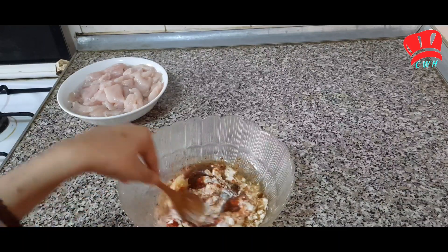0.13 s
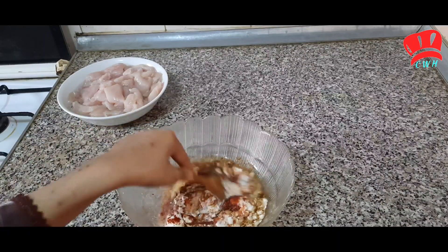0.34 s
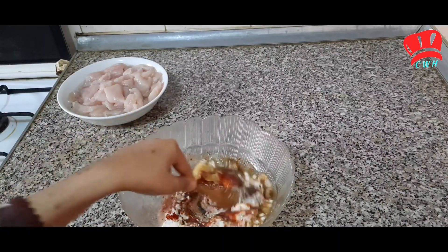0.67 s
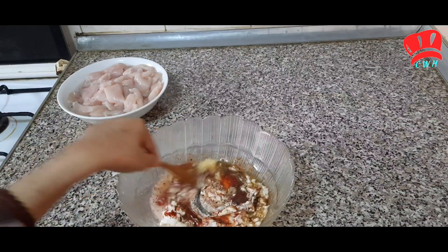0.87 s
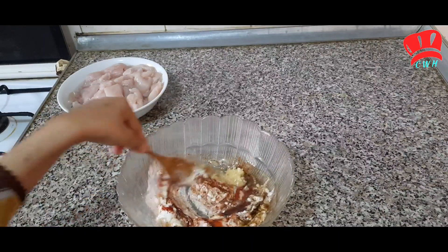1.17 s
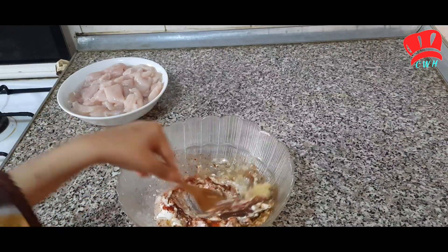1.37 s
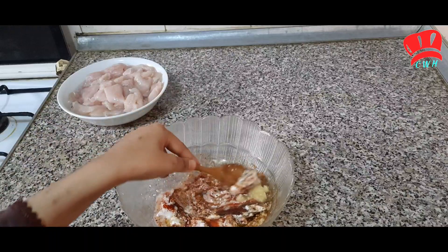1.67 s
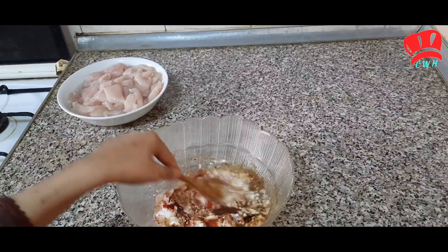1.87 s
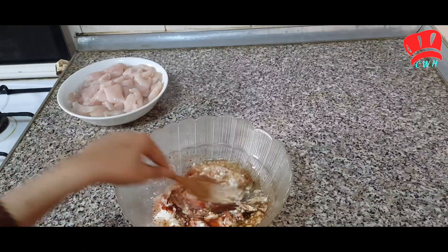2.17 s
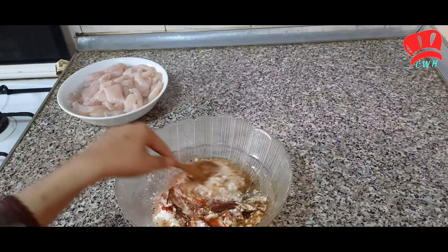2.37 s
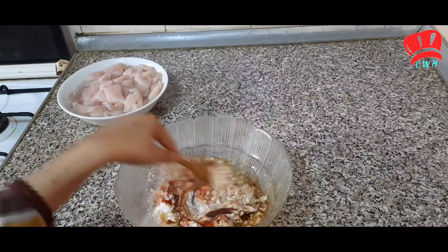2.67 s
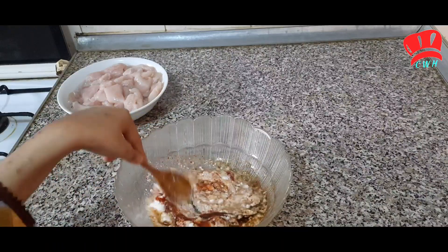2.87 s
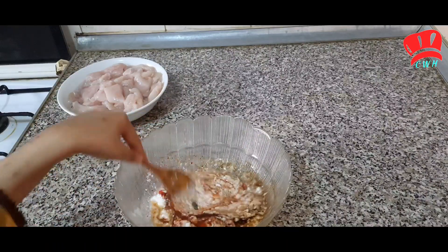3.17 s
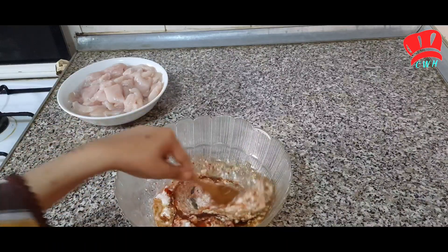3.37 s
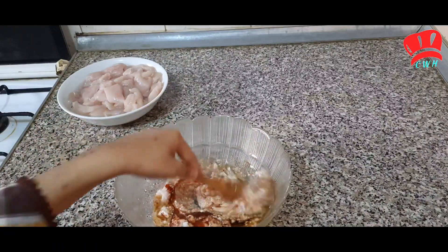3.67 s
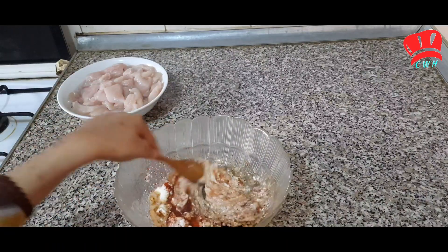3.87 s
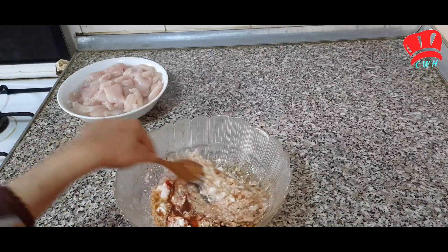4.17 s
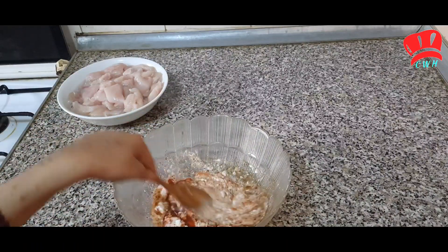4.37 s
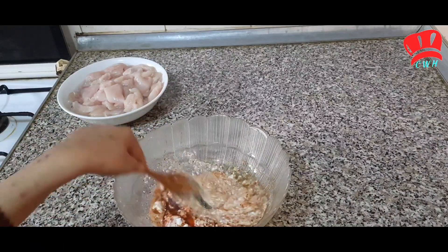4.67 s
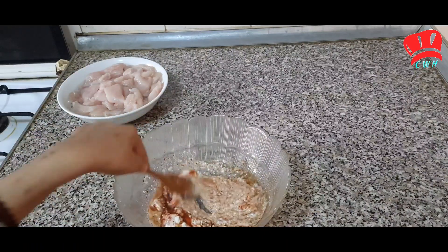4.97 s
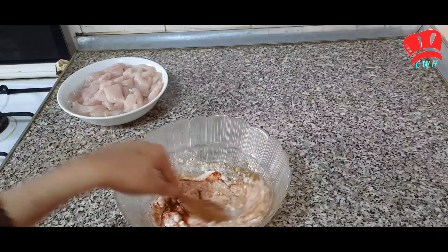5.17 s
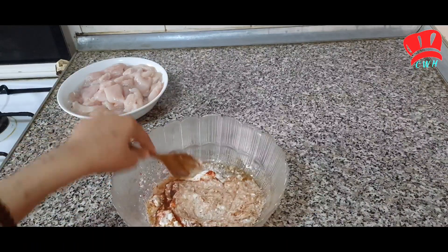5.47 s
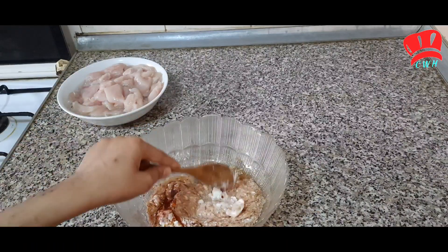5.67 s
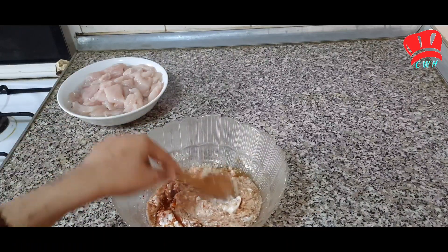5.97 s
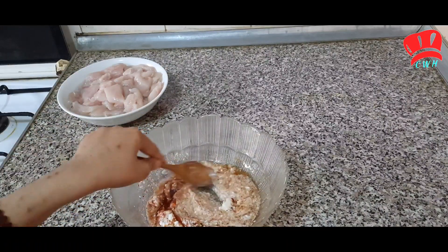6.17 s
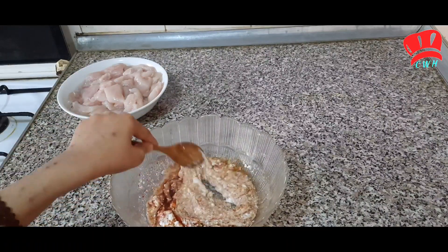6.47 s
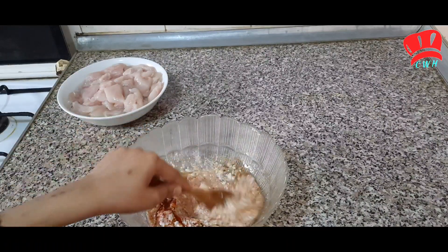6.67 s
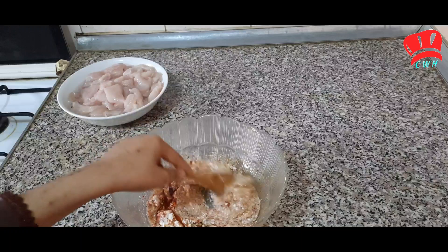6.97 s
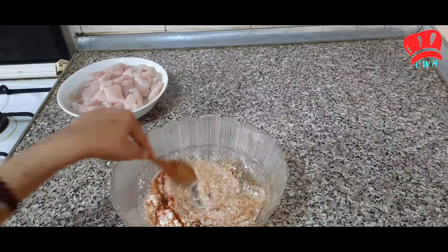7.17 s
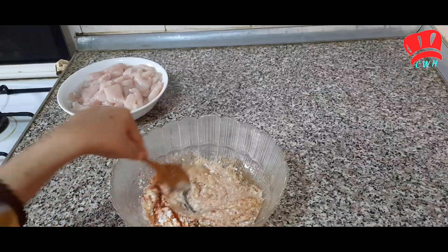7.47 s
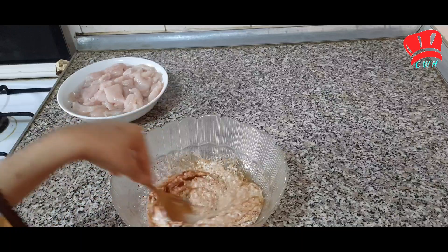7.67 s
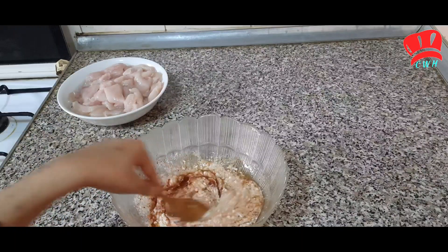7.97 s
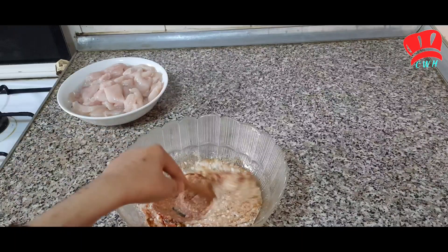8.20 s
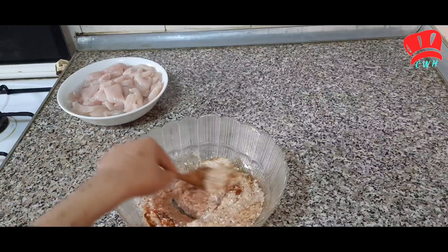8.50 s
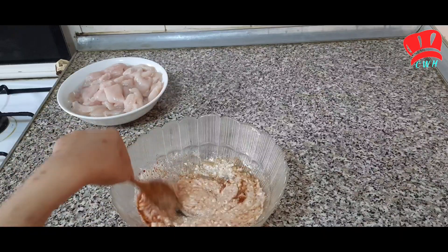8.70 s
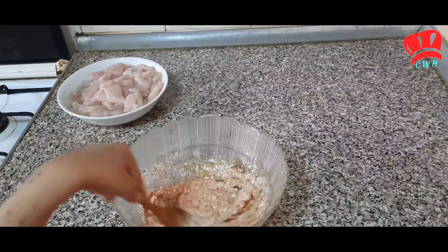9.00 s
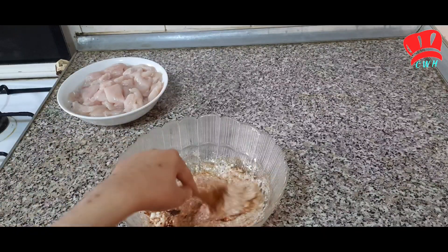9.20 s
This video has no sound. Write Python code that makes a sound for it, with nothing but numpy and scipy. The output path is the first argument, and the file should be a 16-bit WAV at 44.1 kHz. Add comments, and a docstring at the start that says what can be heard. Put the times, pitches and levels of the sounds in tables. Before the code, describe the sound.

A wooden spoon stirs thick wet marinade in a glass bowl on a stone counter, close to the microphone. From the start, soft squelches, sticky smacks and tiny bubble crackles come in uneven sweeps, with low rubbing and light bumps. At about 2.1 seconds the spoon knocks the bowl with a wet smack and a small glass clack. From 2.5 to 5 seconds the stirring is busier, roughly two strokes a second, with dull drags against the bowl. The loudest knock comes at about 5.5 seconds. A few light clacks on bare glass follow between 6.4 and 7 seconds. The wet stirring goes on, with a cluster of smacks and bumps around 8.3 seconds and another knock and clack near 8.9. The sounds are fairly quiet and ring briefly in the tiled kitchen, over a faint steady appliance hum.

```python
"""A tiled kitchen, the stereo microphone close to a glass bowl on a stone counter. A wooden spoon stirs thick
marinade, sweep by sweep: air pockets smack open and tiny wet films crackle along the stroke. The spoon rubs and
knocks the paste-damped bowl against the counter. Behind it the room rings briefly over a faint appliance hum."""
import sys
import numpy as np
from scipy import signal
from scipy.fft import rfft, irfft
from scipy.io import wavfile
from scipy.ndimage import uniform_filter1d, map_coordinates

SR = 44100
rng = np.random.default_rng(int(sys.argv[2]) if len(sys.argv) > 2 else 0)


def log_audio(samples):
    """Write samples as a 16-bit WAV file to the path given in sys.argv[1]."""
    # one column per channel
    frames = np.atleast_2d(samples).T
    # limit to full scale, then quantise
    limited = np.clip(frames, -1, 1)
    pcm = np.round(limited * 32767).astype(np.int16)
    wavfile.write(sys.argv[1], SR, pcm)


N = 411894
TIME = np.arange(N) / SR

# Levels are relative within a table; the functions set each layer's gain.
# room tone spectrum: frequency_hz, gain_db
ROOM_TONE = [(30, -42), (50, 13.5), (75, -13), (100, -7), (130, -3), (200, -11), (320, 1.5), (620, -9),
             (1200, -11), (1700, -17), (3500, -33), (8500, -27.5), (11000, -24), (12700, -23), (15000, -27)]
# appliance hum lines: pitch_hz, level_db
HUM_LINES = [(97, -69), (641, -77), (13873, -89.5)]
# decay of the kitchen: frequency_hz, t60_s
ROOM_DECAY = [(100, 0.24), (260, 0.23), (700, 0.36), (1840, 0.33), (4850, 0.25), (14000, 0.044)]
# likeness of diffuse sound at the two microphone ports: frequency_hz, coherence
PORT_COHERENCE = [(60, 0.98), (200, 0.93), (400, 0.2), (700, 0), (16000, 0)]
# balance of the ports: frequency_hz, left_over_right_db
PORT_BALANCE = [(150, 0.7), (330, -1.5), (700, 4.5), (1400, 2), (2800, 3.5), (5600, -1), (10000, 3.5),
                (14000, 6)]
# spectrum of the spoon rubbing the bowl: frequency_hz, gain_db
RUB_SPECTRUM = [(30, -27.5), (75, -9), (115, 2), (180, -15.5), (330, -3.5), (480, -17.5), (750, -11.5),
                (1200, -54), (3000, -32)]
# modes of the damped bowl and counter: pitch_hz, level_db, t60_s
BOWL_MODES = [(63, -14, 0.26), (111.6, 7.5, 0.14), (154.4, 6, 0.13), (232.2, -2.5, 0.22), (304, -4.5, 0.26),
              (384.4, -10, 0.29), (536, -28.5, 0.28), (635, -18.5, 0.087), (712, -30, 0.4),
              (830, -23.5, 0.12), (966, -31, 0.35)]
# hard drags of the spoon: start_s, length_s, level_db
SPOON_DRAGS = [(0.61, 0.17, -44.5), (2.614, 0.19, -56), (3.184, 0.33, -53), (3.656, 0.16, -52),
               (3.84, 0.22, -58), (4.293, 0.11, -51.5), (4.547, 0.14, -52.5), (4.834, 0.16, -56.5),
               (5.108, 0.13, -50.5)]
# the spoon bumps the bowl: start_s, level_db, hardness_db (middle over bass)
SPOON_KNOCKS = [(0.341, -57, 6), (0.666, -47.5, -5.5), (0.712, -49.5, -41), (0.976, -49.5, -4),
                (1.609, -55.5, 3), (2.137, -35, 2), (2.443, -47, 1.5), (2.747, -42, -5), (2.763, -38.5, -4),
                (3.317, -53, -2.5), (3.709, -44.5, -8.5), (4.181, -55, -15), (4.324, -51.5, -40),
                (4.878, -59, 0), (5.159, -43.5, -13.5), (5.552, -28, -0.5), (5.571, -33, -1),
                (5.836, -60.5, 14.5), (6.366, -51.5, 1.5), (7.271, -53, 1.5), (8.244, -52, 3),
                (8.276, -51, 1), (8.32, -48, 3), (8.445, -50.5, -7), (8.921, -43.5, 4)]
# modes of the bare glass wall: pitch_hz, level_db
GLASS_MODES = [(1460, -2), (1599, 0), (1776, -1), (1985, -1), (2430, -9), (3526, -5), (3741, -4)]
# the spoon hits glass above the paste: start_s, level_db, brightness_db_per_octave
GLASS_CLACKS = [(2.143, -47, -3), (5.553, -46, -6), (6.364, -44, -8), (6.429, -46, -10), (6.827, -43.5, 1),
                (6.841, -47, -6), (6.941, -55, -10), (8.925, -45, 2)]
# sweeps through the paste: start_s, length_s, squelch_db, crackle_db, swell_db, hollow_hz
SWEEPS = [(0, 0.022, -65.5, -76, -5, 1550), (0.09, 0.74, -69.5, -65.5, -8, 2145),
          (0.69, 0.47, -76, -65.5, 2, 1604), (1.09, 0.26, -73, -76, -9, 1540),
          (1.32, 0.26, -64.5, -66, -12.5, 1610), (2.45, 0.53, -64, -60.5, -1, 1710),
          (3.04, 0.45, -62.5, -63.5, -7, 1720), (3.59, 0.39, -81, -68, -27.5, 2150),
          (4.0, 0.46, -64.5, -68, -9, 2040), (4.41, 0.41, -70.5, -70.5, 1, 1890),
          (4.8, 0.35, -73, -70, -14, 1940), (5.82, 0.083, -74.5, -74.5, 15.5, 1550),
          (6.68, 0.033, -65.5, -91, 14.5, 1720), (6.87, 0.19, -63.5, -62.5, 3.5, 1684),
          (7.27, 1, -69.5, -70.5, 5, 2360), (7.94, 0.016, -65.5, -56, -4, 2510),
          (8.09, 0.053, -73, -62, -12, 2400), (8.24, 0.41, -66.5, -67, -7.5, 2130),
          (8.67, 0.31, -61.5, -69, 9, 2250), (9.2, 0.17, -65, -66, 13, 1500)]
# spectrum of a bursting film: frequency_hz, gain_db
FILM_SPECTRUM = [(300, 19), (700, -23), (1300, 7), (3500, 13), (6000, 8), (9000, -7), (13000, 12),
                 (16000, -6)]
# air squeezed through a gap in the paste: start_s, length_s, from_hz, to_hz, level_db, ring_cycles
AIR_SQUEAKS = [(1.102, 0.051, 1300, 1440, -59, 2), (2.782, 0.11, 2560, 1740, -60, 2.5),
               (2.866, 0.088, 1870, 1570, -55.5, 3.5), (3.017, 0.12, 2830, 1430, -55.5, 7),
               (4.111, 0.11, 2240, 1270, -57.5, 2.7), (4.576, 0.044, 2600, 2400, -59, 12),
               (4.673, 0.091, 880, 830, -59, 5.9), (6.374, 0.073, 2040, 1620, -48, 2.2),
               (7.323, 0.08, 2350, 2550, -56, 9.5), (8.266, 0.038, 1644, 1785, -45.5, 16),
               (8.799, 0.083, 2410, 2850, -61.5, 6.5)]
# bubbles bursting at the spoon's edge: peak_s, level_db, pitch_hz
BUBBLE_PIPS = [(0.467, -49, 3100), (0.572, -52.5, 4130), (0.693, -49.5, 5500), (1.041, -49, 10700),
               (1.184, -46.5, 3470), (2.13, -44, 8850), (2.537, -45, 6150), (2.623, -53, 10700),
               (2.698, -42, 8950), (2.722, -52.5, 3450), (2.932, -54, 11000), (3.221, -48, 3970),
               (3.271, -43, 4000), (3.603, -42, 5270), (3.605, -55, 10500), (3.755, -47.5, 4500),
               (4.016, -54, 8700), (4.028, -51, 2180), (4.233, -47, 4820), (4.241, -42.5, 3700),
               (4.347, -52.5, 2330), (4.497, -45, 3850), (4.68, -43.5, 3260), (4.765, -51.5, 9100),
               (4.83, -45.5, 3180), (5.164, -59, 4600), (5.366, -60, 14000), (5.626, -47.5, 10800),
               (6.408, -41.5, 6040), (6.723, -51.5, 10150), (6.827, -40, 3540), (7.199, -55, 13300),
               (7.613, -58, 2680), (7.925, -53, 3260), (8.095, -49, 6100), (8.322, -47.5, 2620),
               (8.369, -49, 3350), (8.69, -42, 4800), (8.924, -34.5, 3400)]
# the loudest wet smacks under the spoon: start_s, level_db, pocket_hz, snap_db, plop_db
WET_SMACKS = [(0.086, -47, 1890, -3.5, -1.5), (0.108, -44, 2400, -25, -3), (0.345, -47.5, 3360, -12, 3.5),
              (0.442, -48, 2310, -5.5, -5.5), (0.691, -48, 1590, -1, -6), (0.776, -44, 1370, -14, -5),
              (1.102, -41, 1290, -12.5, -37), (1.174, -44.5, 2260, -10, -23), (1.285, -50.5, 1680, -27, 0),
              (1.329, -43, 1570, -25, -5), (1.42, -43, 1630, -23, -7), (1.469, -40, 1470, -25, -23),
              (1.639, -49, 1390, -6.5, 0), (2.127, -47, 2470, 0.5, -4), (2.141, -33, 1540, -8.5, -3),
              (2.426, -39.5, 2200, -12, -4.5), (2.536, -47.5, 1950, -9, -1),
              (3.077, -46.5, 1530, -20, -3.5), (3.219, -41, 1920, -5, -13), (3.382, -49, 1810, -8, -17),
              (3.464, -44, 1060, -12, -8), (3.585, -44, 1700, -8, -5), (3.708, -45.5, 1410, -9, 4.5),
              (3.997, -51, 1330, -0.5, 5), (4.107, -47.5, 2230, -34, -32), (4.177, -41.5, 2160, -7, -4.5),
              (4.233, -49.5, 2180, 0.5, 5.5), (4.428, -43, 2020, -10, -40),
              (4.495, -42.5, 1700, -10.5, -21), (4.573, -43, 2640, -10, -10.5), (4.677, -41, 1630, -14, -2),
              (4.727, -46.5, 1620, -8.5, -9), (4.765, -43.5, 1520, -9, 0), (4.951, -44, 1670, -13.5, -14),
              (5.166, -46, 2240, -2.5, -32), (5.543, -44, 1380, -12, 12), (5.552, -38.5, 2170, -14.5, 7),
              (6.053, -53, 13500, 6.5, -28), (6.118, -42, 2070, -4, -11), (6.175, -41.5, 1510, -12, -30),
              (6.364, -34.5, 1950, -8.5, -14), (6.409, -48.5, 1750, -0.5, -11),
              (6.597, -51, 1460, -34, 3.5), (6.828, -36, 1570, -40, -23), (7.198, -49, 3850, -3, -34),
              (7.276, -46, 1480, -6.5, 5.5), (7.453, -54, 2400, -7, -18), (8.249, -44.5, 2400, -8.5, 7.5),
              (8.273, -43, 1750, -11, 3.5), (8.335, -43.5, 2430, -9, -32), (8.431, -42, 1800, -7.5, -37),
              (8.664, -44, 1740, -14, -1), (8.689, -38.5, 1570, -20, -20), (8.925, -36, 2240, -13.5, 1),
              (9.149, -49.5, 1420, -14, -36), (9.276, -45.5, 1410, -29, -4.5)]

SQUELCH, CRACKLE = 2, 3  # the level columns of SWEEPS


def amp(db):
    return 10 ** (np.asarray(db) / 20)


def unit_rms(x):
    return x / np.sqrt(np.mean(x ** 2) + 1e-20)


def unit_crest(x, size=220):
    """Scaled so that the loudest stretch of `size` samples has rms 1."""
    return x / np.sqrt(uniform_filter1d(x ** 2, size, mode="constant").max() + 1e-20)


def curve_at(points, hz):
    """A table interpolated along log frequency."""
    freqs, values = np.transpose(points)
    return np.interp(np.log(hz + 1), np.log(freqs), values)


def add(mix, start_s, sound):
    part = mix[max(round(start_s * SR), 0):][:len(sound)]
    part += sound[:len(part)]


def colour(x, spectrum, size=4096):
    """Causal filter with the given spectrum, so that clicks keep their sharp front."""
    log_gain = np.log(amp(curve_at(spectrum, abs(np.fft.fftfreq(size, 1 / SR)))))
    taps = np.fft.ifft(np.exp(np.conj(signal.hilbert(log_gain)))).real[:size // 2]
    return signal.oaconvolve(x, taps)[:len(x)]


def band(x, low_hz, high_hz):
    sos = signal.butter(2, [low_hz, min(high_hz, .48 * SR)], "band", fs=SR, output="sos")
    return signal.sosfilt(sos, x)


def clicks(per_s, spread_db, size=N):
    """Random impulses of either sign: many small, a few large."""
    height = amp(spread_db * np.minimum(rng.exponential(1, size), 2.6))
    return height * rng.choice([-1, 1], size) * (rng.random(size) < per_s / SR)


def excite(impulses, ring):
    return signal.oaconvolve(impulses, ring)[:N]


def diffuse(pair):
    """Two unrelated signals become alike in the bass, as at two closely spaced ports."""
    left, other = rfft(pair)
    alike = curve_at(PORT_COHERENCE, np.fft.rfftfreq(pair.shape[1], 1 / SR))
    right = alike * left + np.sqrt(1 - alike ** 2) * other
    return irfft(np.array([left, right]), pair.shape[1])


def room(x, wet_db, tails=4, slot=14):
    """Direct sound plus dense reflections off counter and tiles, which shift as the spoon circles."""
    out, slots = np.array([x, x]), np.arange(90, SR // 2, slot)
    for k in range(tails):
        taps = np.zeros((2, SR // 2 + slot))
        arrivals = slots + rng.integers(0, slot, (2, len(slots)))
        np.put_along_axis(taps, arrivals, rng.choice([-1., 1.], arrivals.shape), 1)
        hz, t, spectra = signal.stft(diffuse(taps), SR, nperseg=256)
        decay = amp(-60 * t / curve_at(ROOM_DECAY, hz)[:, None])
        tail = signal.istft(spectra * decay, SR, nperseg=256)[1]
        tail /= np.linalg.norm(tail[0])
        share = np.sqrt(2 / tails) * np.cos(np.pi * (TIME + k / tails))
        out += amp(wet_db) * signal.oaconvolve((x * share)[None], tail, axes=1)[:, :N]
    return out


def bowl_echo(x, delay_s=.0046, echo_db=-15.5):
    """The far wall of the bowl throws each wet sound back."""
    return x + amp(echo_db) * np.pad(x, (round(delay_s * SR), 0))[:N]


def room_tone(air_db=-67, drift_db=1, waver_rad=.3):
    """Gently drifting room air and the slightly wavering hum of an appliance."""
    noise = diffuse(rng.standard_normal((2, N)))
    spectrum = amp(curve_at(ROOM_TONE, np.fft.rfftfreq(N, 1 / SR)))
    air = unit_rms(irfft(rfft(noise) * spectrum, N))
    hum, knots_s = np.zeros(N), np.linspace(0, TIME[-1], 90)
    for hz, db in HUM_LINES:
        waver = np.interp(TIME, knots_s, np.cumsum(rng.normal(0, waver_rad, len(knots_s))))
        hum += amp(db) * np.sqrt(2) * np.sin(2 * np.pi * hz * TIME + waver)
    drift = np.interp(TIME, knots_s, rng.standard_normal(len(knots_s)))
    return amp(air_db + drift_db * drift) * air + hum


def effort(column, bite_s=.002, settle_s=.042, creep_db=-94):
    """Amplitude of the stirring: each sweep bites, swells or fades, and lets go; then the paste creeps."""
    level = np.full(N, amp(creep_db))
    for sweep in SWEEPS:
        start_s, length_s, _, _, swell_db, _ = sweep
        age = TIME - start_s
        gate = np.clip(age / bite_s, 0, 1) * np.exp(-np.maximum(age - length_s, 0) / settle_s)
        level += gate * amp(sweep[column] + swell_db * (np.clip(age / length_s, 0, 1) - .5))
    return level


def rubbing(rest_db=-71.5, push_db=-2):
    """The spoon sticks and slips over lumps on the glass, pressing harder in a strong sweep."""
    pressure = np.hypot(amp(rest_db), amp(push_db) * effort(SQUELCH))
    slips = colour(clicks(per_s=420, spread_db=3), RUB_SPECTRUM)
    return room(unit_rms(slips) * pressure, wet_db=.5)


def drags(tilt_db_per_octave=-5, centre_hz=85):
    """Quick slips of the spoon keep the bowl's lowest modes shuddering on the counter."""
    out, t = np.zeros(N), np.arange(SR // 4) / SR
    ring = sum(amp(db + tilt_db_per_octave * abs(np.log2(hz / centre_hz)) - 60 * t / t60)
               * np.sin(2 * np.pi * hz * t) for hz, db, t60 in BOWL_MODES)
    shudder = excite(clicks(per_s=300, spread_db=1.6), ring)
    for start_s, length_s, db in SPOON_DRAGS:
        part = shudder[round(start_s * SR):][:int(length_s * SR)]
        add(out, start_s, amp(db) * unit_rms(part) * signal.windows.tukey(len(part), .7))
    return room(out, wet_db=-12)


def knocks(contact_s=.0065, chatter_s=.014, ring_db=1, chatter_db=-7):
    """Each bump rings the bowl; harder ones reach the upper modes, and the foot chatters on the stone."""
    rings, chatters, t = np.zeros(N), np.zeros(N), np.arange(SR // 3) / SR
    for start_s, db, hardness_db in SPOON_KNOCKS:
        tilt_db = .83 * (min(hardness_db, 0) + 5)  # per octave away from 130 Hz
        modes = sum(amp(mode_db + tilt_db * abs(np.log2(hz / 130)) - 60 * t / t60)
                    * np.sin(2 * np.pi * hz * rng.normal(1, .009) * t)
                    for hz, mode_db, t60 in BOWL_MODES)
        ring = modes * (1 - np.exp(-t / contact_s))  # the paste cushions the blow
        chatter = band(rng.standard_normal(len(t)) * np.exp(-t / chatter_s), 200, 520)
        add(rings, start_s, amp(db + ring_db) * unit_crest(ring, size=660))
        add(chatters, start_s, amp(db + chatter_db + hardness_db) * unit_crest(chatter))
    return room(rings, wet_db=-10.5) + room(chatters, wet_db=2.5)


def clacks(t60_s=.21, spot_spread_db=2):
    """Wood on bare glass: every clack lands on another spot and rings another mix of modes."""
    out, t = np.zeros(N), np.arange(SR // 4) / SR
    for start_s, db, brightness in GLASS_CLACKS:
        ring = sum(amp(mode_db + brightness * np.log2(hz / 1800) + rng.normal(0, spot_spread_db))
                   * np.sin(2 * np.pi * (hz * t + rng.random())) for hz, mode_db in GLASS_MODES)
        add(out, start_s, amp(db - 60 * t / t60_s) * unit_crest(ring))
    return room(out, wet_db=-4)


def fizz(gain_db=-9):
    """Countless microscopic films tear as the paste slides off the wood."""
    tears = band(clicks(per_s=1500, spread_db=3), 5000, 11500)
    return unit_rms(tears) * effort(CRACKLE) * amp(gain_db)


def squeaks(gain_db=-2):
    """Tiny uneven bursts ring one air pocket as it swells or shrinks; a damped pocket wobbles more."""
    out = np.zeros(N)
    for start_s, length_s, from_hz, to_hz, db, cycles in AIR_SQUEAKS:
        size = int(length_s * SR)
        wobble = unit_rms(uniform_filter1d(rng.standard_normal(SR // 4), size=200))[:size]
        hz = np.geomspace(from_hz, to_hz, size) * np.exp(.25 * wobble / cycles)
        phasor = np.exp(2j * np.pi * np.cumsum(hz) / SR)
        feedback = np.exp(-from_hz / cycles / SR)
        bursts = clicks(per_s=320, spread_db=2.2, size=SR // 4)[:size]
        ring = (phasor * signal.lfilter([1], [1, -feedback], bursts / phasor)).imag  # gliding resonator
        add(out, start_s, amp(db + gain_db) * unit_rms(ring) * signal.windows.tukey(size, .5))
    return out


def pocket(t, hz, cycles, rise=.022):
    """An air pocket rings for a few cycles, its pitch rising as it opens."""
    age = t * hz / cycles
    return np.exp(-age) * np.sin(2 * np.pi * np.cumsum(hz * (1 + rise * np.minimum(age, 2))) / SR)


def crackle(tick_db=-7, gain_db=-7):
    """Wet films of every size burst as the paste pulls apart; gritty bits tick against the glass."""
    t = np.arange(400) / SR
    films = sum(excite(clicks(per_s=45, spread_db=5), pocket(t, hz, cycles=1.3) * hz ** 1.5)
                for hz in np.geomspace(750, 14000, 12))
    ticks = amp(tick_db) * unit_rms(clicks(per_s=70, spread_db=6))
    return unit_rms(colour(unit_rms(films) + ticks, FILM_SPECTRUM)) * effort(CRACKLE) * amp(gain_db)


def hollow_hz(octaves_per_s=.18):
    """Every sweep opens a new hollow behind the spoon, whose pitch rises as it closes."""
    hz = np.full(N, float(SWEEPS[0][-1]))
    for start_s, length_s, *_, middle_hz in SWEEPS:
        since = TIME >= start_s
        age = np.minimum(TIME[since] - start_s, length_s)
        hz[since] = middle_hz * 2 ** (octaves_per_s * (age - length_s / 2))
    return hz


def squelch(scatter=.25, gain_db=-5):
    """Small air pockets open along the stroke, scattered round the size of the hollow."""
    pitches, t = np.geomspace(600, 5000, 30), np.arange(1500) / SR
    wanted_hz = hollow_hz() * np.exp(scatter * rng.standard_normal(N))
    which = np.minimum(np.searchsorted(pitches, wanted_hz), len(pitches) - 1)
    pops = clicks(per_s=210, spread_db=1)
    rings = sum(excite(pops * (which == k), pocket(t, hz, cycles=4)) * np.sqrt(hz)
                for k, hz in enumerate(pitches))
    return unit_rms(rings) * effort(SQUELCH) * amp(gain_db)


def clumps(swell_s=.002, decay_s=.006, steady=.3):
    """The paste lets go in fits: a gain of brief spurts over a steady share."""
    t = np.arange(SR // 20) / SR
    spurt = (1 - np.exp(-t / swell_s)) * np.exp(-t / decay_s)
    return unit_rms(steady + excite(abs(clicks(per_s=48, spread_db=1.5)), spurt / spurt.max()))


def pip(t, hz, swell_s, rough):
    """A tiny bubble swells and dies within milliseconds, roughened by its tearing film."""
    age = t / swell_s
    tone = np.sin(2 * np.pi * hz * t * (1 + np.minimum(age, 8) / 100))
    film = unit_rms(band(rng.standard_normal(len(t)), .55 * hz, 1.55 * hz))
    return (tone + rough * film) * age ** 2 * np.exp(-2 * age)


def faint_pips(swell_cycles=2.2, gain_db=-6):
    """Many faint bubbles, still sparse enough to be heard one by one."""
    t = np.arange(600) / SR
    bubbles = sum(excite(clicks(per_s=3.5, spread_db=2), pip(t, hz, swell_cycles / hz, rough=.5))
                  for hz in np.geomspace(1400, 9000, 24))
    return unit_rms(bubbles) * effort(CRACKLE) * amp(gain_db)


def close_pips(swell_cycles=3, gain_db=-1):
    """The clearest bubbles burst crisply, close to the microphone."""
    out, t = np.zeros(N), np.arange(500) / SR
    for peak_s, db, hz in BUBBLE_PIPS:
        swell_s = max(swell_cycles / hz, .0006)
        bubble = unit_crest(pip(t, hz, swell_s, rough=.72), size=88)
        add(out, peak_s - swell_s, amp(db + gain_db) * bubble)
    return room(bowl_echo(out), wet_db=-4)


def smacks(peel_s=.039, open_s=.0016, tear_s=.00085, break_s=.0004):
    """A film snaps and peels off in ticks; the pocket behind it rings and the paste plops back."""
    bodies, snaps, t = np.zeros(N), np.zeros(N), np.arange(SR // 8) / SR
    for start_s, db, hz, snap_db, plop_db in WET_SMACKS:
        tear_noise, open_noise = rng.standard_normal((2, len(t)))
        ticks = unit_rms(clicks(per_s=480, spread_db=3, size=len(t)))
        peel = amp(-15) * ticks * np.exp(-t / peel_s)
        opening = open_noise * np.exp(-t / open_s) + peel
        ring = unit_crest(signal.fftconvolve(pocket(t, hz, cycles=2.2), opening)[:len(t)])
        tearing = tear_noise * np.exp(-t / tear_s) + .74 * peel
        tear = unit_crest(band(tearing, max(1300, .5 * hz), max(3700, 1.73 * hz)))
        air_share = np.sqrt(1 - min(amp(snap_db) ** 2, .85))  # a thin film holds little air
        body = amp(-8) * air_share * unit_crest(ring + amp(-3) * tear)
        plop = amp(plop_db - 10) * unit_crest(band(opening, 284, 944))
        add(bodies, start_s, amp(db) * (body + plop))
        film = (t == 0) + amp(-9) * opening * (1 - np.exp(-t / break_s))  # a sharp break, then fraying
        snap = unit_crest(band(film, max(3600, .85 * hz), max(13500, 1.3 * hz)))
        add(snaps, start_s, amp(db + snap_db - 6) * snap)
    return room(bowl_echo(bodies), wet_db=-.5) + room(bowl_echo(snaps), wet_db=2.5)


def scene():
    """Wet paste, spoon and bowl up close, the kitchen behind them."""
    paste = (squelch() + crackle()) * clumps() + faint_pips() + fizz() + squeaks()
    stirring = room(bowl_echo(paste), wet_db=-3.5)
    return smacks() + close_pips() + stirring + knocks() + drags() + rubbing() + room_tone()


def record(dry, turn_s=1.07, lag_s=62e-6, swing_s=50e-6, low_cut_hz=48, top_hz=15900):
    """The left port is nearer the bowl: mostly louder, and ahead by a lag that swings with the spoon."""
    right_lag_s = lag_s + swing_s * np.sin(2 * np.pi * TIME / turn_s)
    right = map_coordinates(dry[1], [(TIME - right_lag_s) * SR], order=3)
    lean_db = curve_at(PORT_BALANCE, np.fft.rfftfreq(N, 1 / SR)) / 2
    ports = irfft(rfft(np.array([dry[0], right])) * amp([lean_db, -lean_db]), N)
    low_cut = signal.butter(4, low_cut_hz, "high", fs=SR, output="sos")
    band_limit = signal.firwin(511, top_hz, window=("kaiser", 9), fs=SR)
    return signal.oaconvolve(signal.sosfilt(low_cut, ports), band_limit[None], "same")


dry = scene()
out = record(dry)
log_audio(out)
```